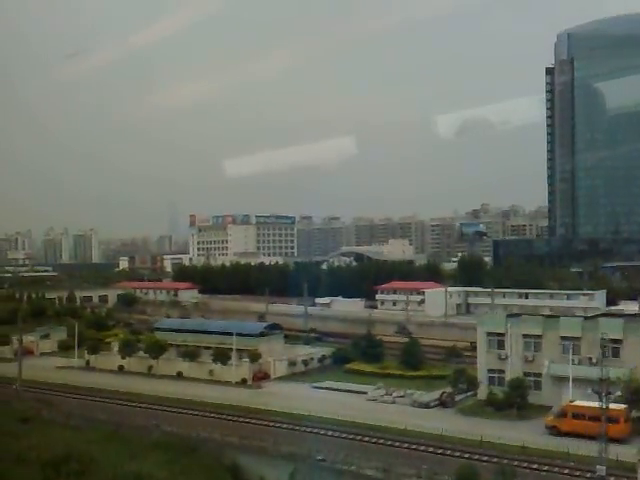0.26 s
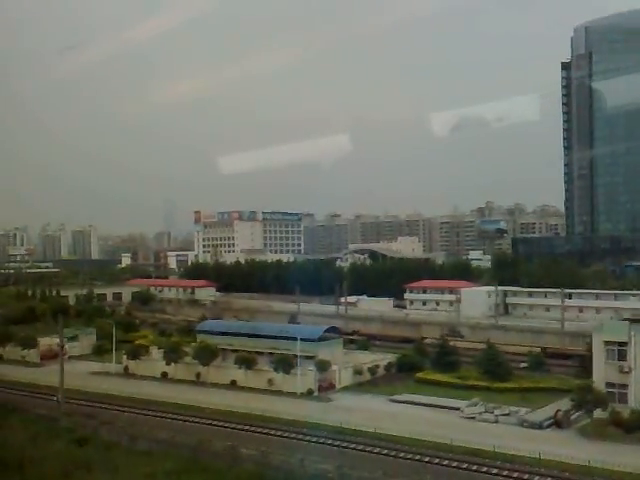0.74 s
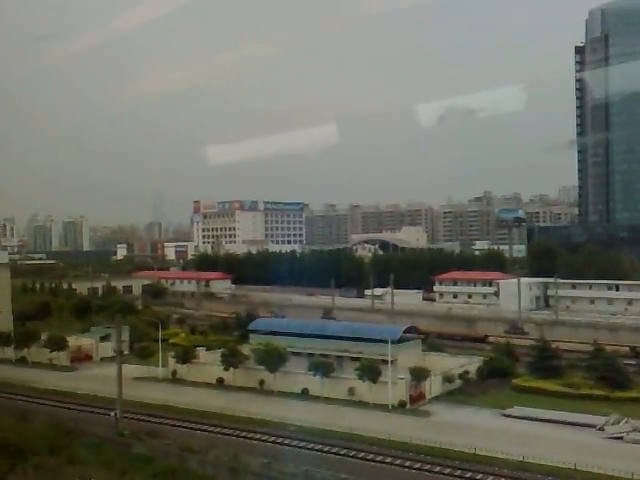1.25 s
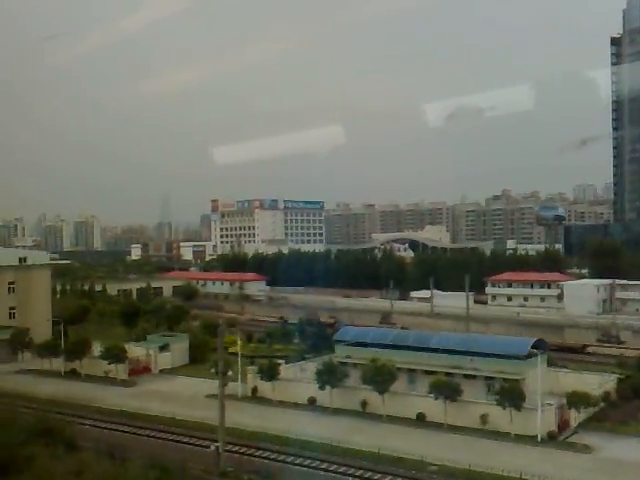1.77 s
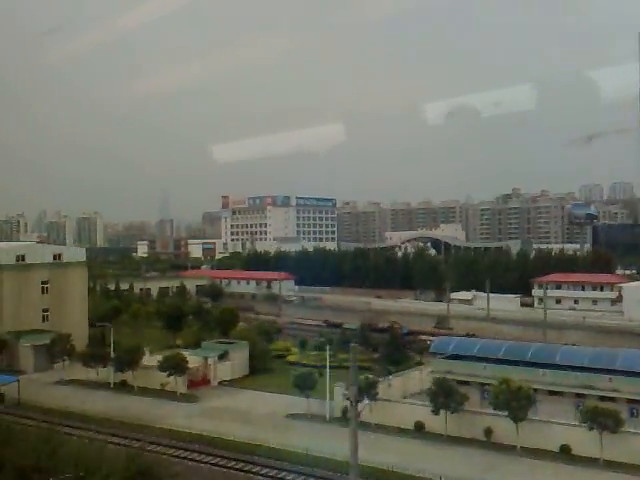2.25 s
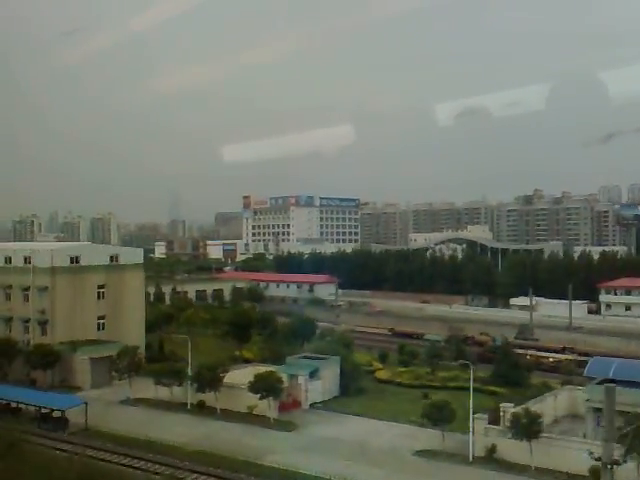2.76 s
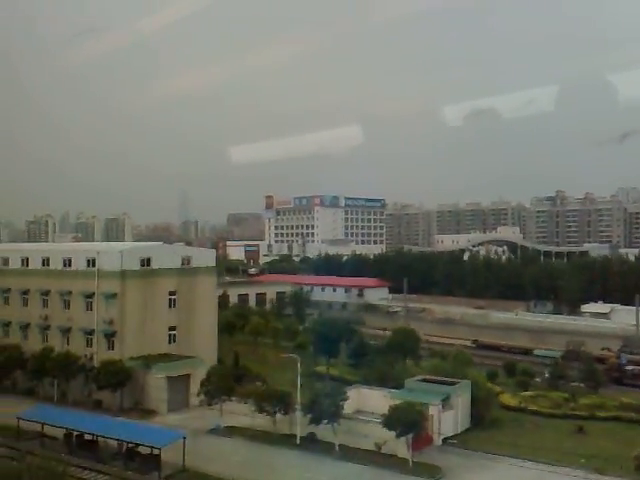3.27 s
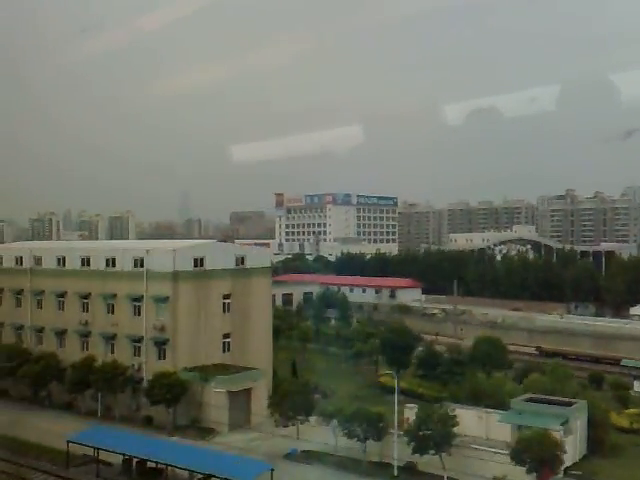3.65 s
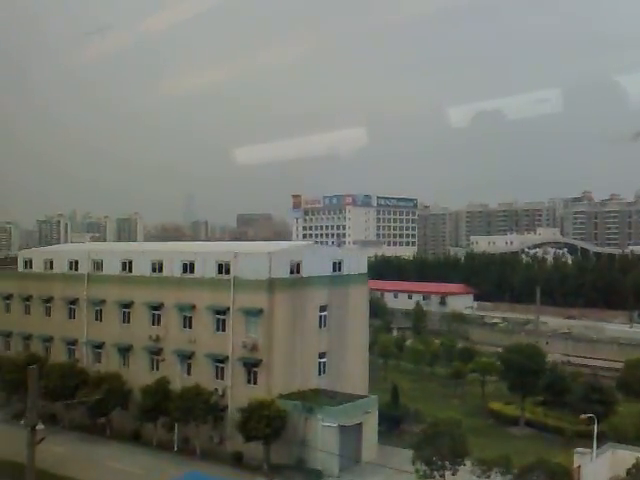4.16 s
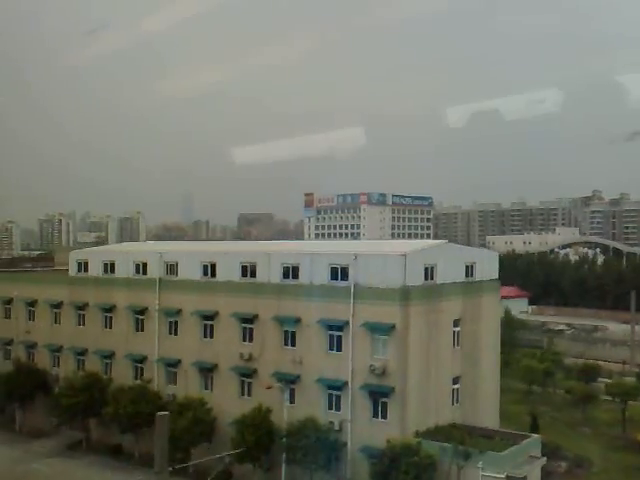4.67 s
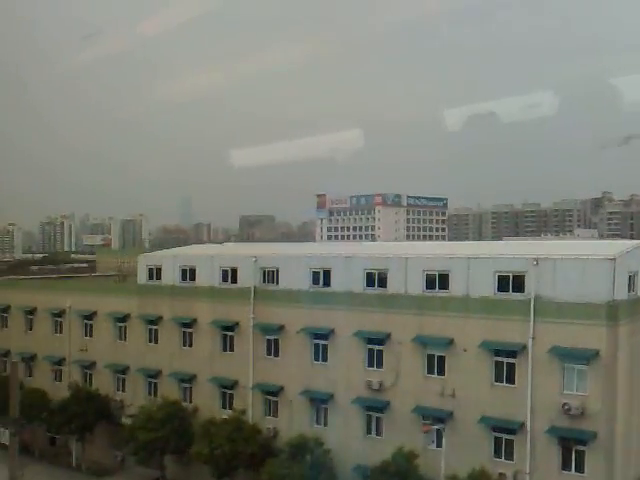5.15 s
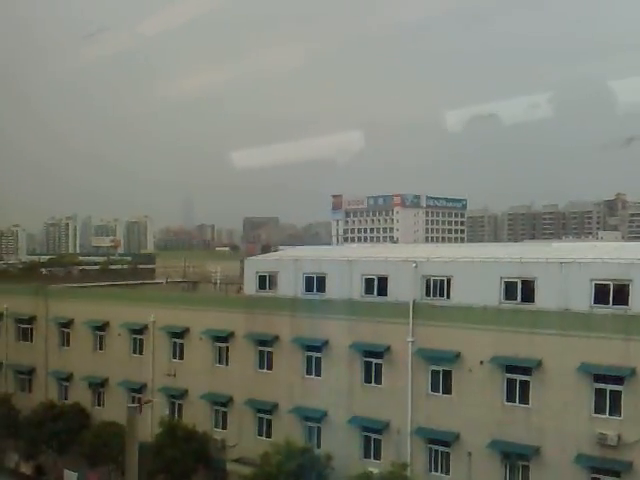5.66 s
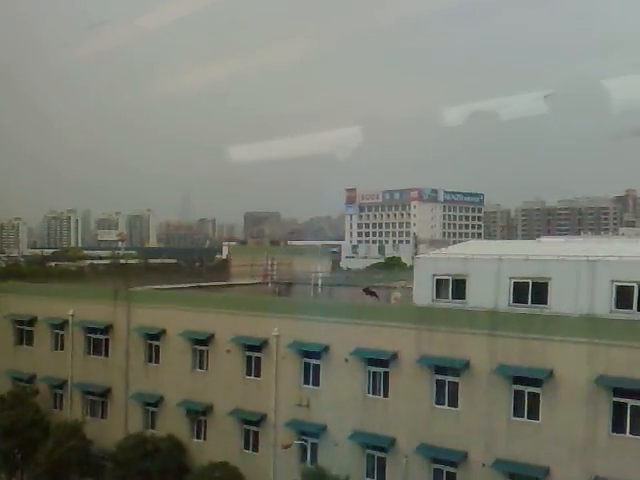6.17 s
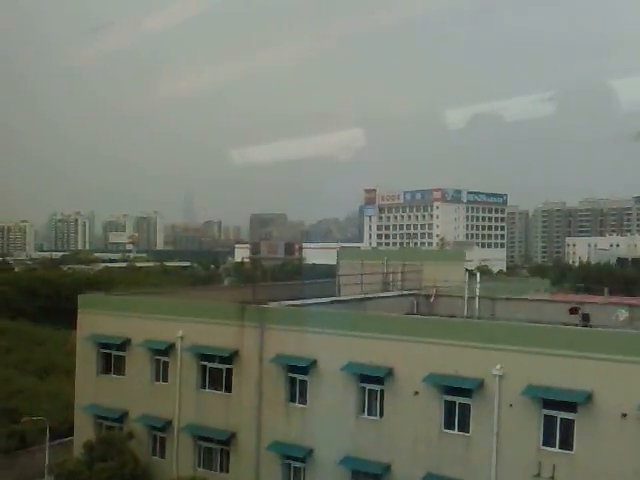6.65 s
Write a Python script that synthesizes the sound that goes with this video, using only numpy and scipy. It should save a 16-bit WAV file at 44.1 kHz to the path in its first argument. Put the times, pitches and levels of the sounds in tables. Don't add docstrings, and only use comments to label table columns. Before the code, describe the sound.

Interior of a magnetic train slowing down, captured by a small hand-held camera at seat height. At 0 s the last swing of a soft low thump fades into continuous deep rumble, mostly 50 to 150 hertz, rising and easing with the ride. Over it a clean low whine starts near 310 hertz and glides to about 265 by 6.9 s, swelling around 1.3, 3 and 5 s and dipping between, with fainter high and low tones falling alongside. Muted air rush and slight hiss stay steady; panels shudder briefly. At 1.13-1.18 s a nearby latch rattles with a short buzz. Tiny dry finger clicks on plastic come at 1.3, 1.45, 2.6 and 3.3 s, loudest at 3.5, then 5.0, 5.4, 6.5 and 6.65 s. Faint cloth rubs and strap squeaks are scattered among them. From about 5 s a throbbing cabin boom near 97 hertz grows stronger. Very short, padded echo.

```python
import sys
import numpy as np
from scipy import signal
from scipy.io import wavfile
from scipy.ndimage import uniform_filter1d, map_coordinates

SR = 44100
rng = np.random.default_rng(int(sys.argv[2]) if len(sys.argv) > 2 else 0)


def put_to_file(sound):
    columns = np.atleast_2d(sound).T
    safe = np.clip(columns, -1, 1)
    whole_steps = np.round(safe * 32767)
    wavfile.write(sys.argv[1], SR, whole_steps.astype(np.int16))


def volts_from_db(level):
    exponent = np.asarray(level, float) / 20
    return 10 ** exponent


N = 304731
STEP = 256


def evened(x):
    return x / np.sqrt(np.mean(x ** 2) + 1e-20)


def peaked(x):
    return x / abs(x).max()


def curve(rows, t):
    s, db = np.transpose(rows)
    return np.interp(t, s, db)


def slow_times():
    return np.arange(0, N + STEP, STEP) / SR


def fine(slow):
    return np.interp(np.arange(N) / STEP, np.arange(len(slow)), slow)


def wander(per_s):
    knots = rng.standard_normal(400)
    return map_coordinates(knots, [slow_times() * per_s], order=3)


def bell(t, s, span):
    return np.exp(-.5 * ((t - s) / span) ** 2)


def add(mix, s, sound):
    part = mix[round(s * SR):][:len(sound)]
    part += sound[:len(part)]


def resonate(x, hz, width_hz):
    r = np.exp(-np.pi * width_hz / SR)
    return (1 - r) * signal.lfilter([1, -r], [1, -2 * r * np.cos(2 * np.pi * hz / SR), r * r], x)


def resonate_twice(x, hz, width_hz, second_width_hz):
    return resonate(resonate(x, hz, width_hz), hz, second_width_hz)


def tone(turns, db):
    return np.sqrt(2) * fine(volts_from_db(db)) * np.sin(2 * np.pi * (turns + rng.random()))


def thump():
    t = np.arange(N) / SR
    return volts_from_db(-12.5) * np.exp(-.5 * (t / 0.0054) ** 2) * np.cos(2 * np.pi * 85 * (t - 0.0024))


# (time [s], level [dB])
WHINE = [(0, -44), (.2, -32), (1.2, -23.5), (1.5, -23.5), (1.72, -34.5), (1.95, -32), (2.12, -41.5),
         (2.4, -28.5), (3.2, -26), (3.55, -34.5), (3.82, -28), (4.16, -41.5), (4.4, -26.5), (4.85, -23),
         (5.45, -25.5), (5.8, -31.5), (6.7, -34.5), (6.91, -29.5)]
STRONG_ORDERS = (6, 6, 6, 12, 12, 12, 12, 141, 141, 141, 142, 142, 142, 144, 144, 144, 144, 144, 216, 144,
                 216, 216, 66, 66, 66, 143, 134, 136)
# (top level [dB], time [s], span [s])
STRONG_SWELLS = [(-32.5, 1.6, 0.68), (-34.5, 3.3, 1.3), (-35, 6.1, 0.99), (-30, 0.98, 0.55),
                 (-30, 3.1, 1.6), (-31.5, 5.2, 0.4), (-30, 4.7, 0.12), (-45.5, 2.9, 0.44), (-38, 5.7, 0.65),
                 (-49, 6.8, 0.23), (-41.5, 3.45, 0.26), (-38.5, 4.3, 0.4), (-53.5, 5.8, 0.76),
                 (-46.5, 0.3, 0.5), (-45, 2.8, 1.2), (-44.5, 3.4, 0.63), (-40.5, 4.15, 0.72),
                 (-43, 5.6, 0.92), (-63, 1.5, 1.8), (-41.5, 6.85, 0.24), (-59, 3.7, 0.9),
                 (-56.5, 6.3, 0.88), (-47.5, 0.88, 0.8), (-41, 2.5, 0.29), (-39.5, 5.7, 0.7),
                 (-43.5, 2.4, 1.1), (-53, 0.54, 0.4), (-49, 6.75, .2)]
FAINT_ORDERS = (14, 18, 24, 30, 32, 48, 54, 60, 66, 68, 78, 132, 134, 136, 138, 140, 146, 162, 210, 288)
# (top level [dB], time [s], span [s])
FAINT_SWELLS = [(-40.5, 2.1, 4.3), (-40.5, 5.6, 1), (-42.5, 1.2, 2), (-33, 0.6, .6), (-43, 3.3, 3.6),
                (-45, 3.9, 8), (-55.5, 1.1, 0.9), (-44.5, 5.4, 0.4), (-57.5, 1.3, 0.59), (-46, 3.6, 1.3),
                (-46, 2.9, 0.14), (-53, 1.5, 1), (-51.5, 3.3, 3.8), (-49.5, 3.6, 0.49), (-48, 4.4, 0.67),
                (-48.5, 6.5, 0.5), (-47.5, 4.6, 0.14), (-61.5, 2.5, 1.4), (-66, 1.3, 2.7), (-70.5, 5, 5.9)]
SLOTS_PER_GIRDER = 72
SLOT_HZ, BRAKE_HZ_PER_S, BRAKE_GROWTH_HZ_PER_S2 = 312.9, 5.2, .22


def magnets():
    t = slow_times()
    hz = SLOT_HZ - BRAKE_HZ_PER_S * t - BRAKE_GROWTH_HZ_PER_S2 * t ** 2 + 0.28 * wander(1.477)
    girders = np.cumsum(fine(hz)) / SR / SLOTS_PER_GIRDER
    waver_db = .8 + 1.8 * (t > 6.05)
    slot_turns = SLOTS_PER_GIRDER * girders + fine(0.025 * wander(12.))
    out = tone(slot_turns, curve(WHINE, t) + waver_db * wander(8.0))
    for order, (db, s, span) in zip(STRONG_ORDERS, STRONG_SWELLS):
        fade_db = -30 * (1 - bell(t, s, span))
        out += tone(order * girders, db + fade_db + 1.5 * np.tanh(wander(5.5)))
    for order, (db, s, span) in zip(FAINT_ORDERS, FAINT_SWELLS):
        fade_db = -20 * (1 - bell(t, s, span))
        out += tone(order * girders, db + fade_db + 3.2 * np.tanh(wander(4.)))
    return out


def boom():
    t = slow_times()
    awake = .5 + .5 * np.tanh((t - 5.2) / 0.79)
    throb = np.cos(2 * np.pi * (t - 1.16) / 0.98)
    throb_db = 4.5 + (1 - 4.5) * awake
    level_db = -35.5 + (-28 + 35.5) * awake + throb_db * throb - 1.06 * wander(6.)
    hz = 96.9 + (2.5 - 1.8 * awake) * wander(3.)
    return tone(np.cumsum(fine(hz)) / SR, level_db)


# (frequency [Hz], width [Hz], level [dB])
PANELS = [
    (576.7, 49.7, 12),
    (672, 10, -4),
    (679, 40, 5),
    (848, 56, 8),
    (1706, 28, 7),
    (2000, 150, 0),
]


def rush(spectrum, control, size, top_share, above_hz, patchy_db):
    frames, hz = 4 * N // size + 5, np.fft.rfftfreq(size, 1 / SR)
    a, b, patches = rng.standard_normal((frames, len(hz), 3)).T
    patches = evened(uniform_filter1d(uniform_filter1d(patches, size=9, axis=0), size=7, axis=1))
    f, db = np.transpose(spectrum)
    shape_db = np.interp(np.log(hz + 1), np.log(f + 1), db)
    for centre, width, gain_db in PANELS:
        shape_db += gain_db / (1 + (2 * (hz - centre) / width) ** 2)
    top = (hz ** 4 / (hz ** 4 + above_hz ** 4))[:, None]
    tilt_db = (top_share - 1) * curve(control, np.arange(frames) * size / 4 / SR)
    field_db = shape_db[:, None] + top * tilt_db + patchy_db * patches
    spectra = (a + 1j * b) * volts_from_db(field_db)
    return evened(signal.istft(spectra, nperseg=size, noverlap=3 * size // 4)[1][:N])


# (frequency [Hz], density [dB per Hz])
RUMBLE = [(12, -33.5), (30, -17.5), (50, -1.5), (68, -5), (90, 0.5), (120, -7), (140, -7), (165, -10),
          (220, -17), (300, -12), (350, -22), (500, -22.5), (740, -37), (2000, -94.5)]
# (time [s], level [dB])
RIDE = [(0, 1), (.4, 0.5), (1.2, -2.5), (1.85, 0), (2.1, 2), (2.55, 0.5), (2.9, -2), (3.9, -0.5),
        (4.2, 1.5), (4.35, -3), (4.62, 0), (5.3, -2), (5.5, -5), (5.9, -1.5), (6.4, -0.5), (6.75, -1.5),
        (6.86, -4), (6.91, 5.5)]


def rumble():
    noise = rush(RUMBLE, RIDE, size=4096, top_share=0.35, above_hz=140, patchy_db=1.04)
    return fine(volts_from_db(-24.5 + curve(RIDE, slow_times()))) * noise


# (frequency [Hz], density [dB per Hz])
AIR = [(300, -25), (650, -3.5), (850, -10.5), (1010, -9), (1580, -17), (1920, -17.5), (2770, -28),
       (5000, -35.5), (9480, -41), (15000, -42), (16500, -43.5)]
# (time [s], level [dB])
GUSTS = [(0, -1), (.6, -0.5), (1.1, -2.5), (1.7, 0.5), (2.2, 0.5), (2.9, -1), (3.3, -0.5), (3.9, 0),
         (4.3, 1.5), (4.8, -2.5), (5.3, -2), (5.5, -1), (5.9, -1), (6.2, 0), (6.91, 1.5)]


def air():
    noise = rush(AIR, GUSTS, size=1024, top_share=0.65, above_hz=1000, patchy_db=1.23)
    return fine(volts_from_db(-48.5 + curve(GUSTS, slow_times()) + 0.4 * wander(6.))) * noise


def hums(rows):
    out = np.zeros(N)
    for s, length, db, hz, width_hz in rows:
        hum = resonate_twice(rng.standard_normal(2 * SR), hz, width_hz, 2 * width_hz)
        hum = hum[SR // 2:][:round(length * SR)]
        add(out, s, volts_from_db(db) * evened(hum) * signal.windows.tukey(len(hum), .6))
    return out


# (start [s], length [s], level [dB], centre [Hz], width [Hz])
SHUDDERS = [(0, .35, -30, 51, 5), (0, 0.51, -34, 129.6, 6), (.45, .5, -32.5, 77.8, 5.4),
            (2.05, 0.44, -28, 103.4, 6.5), (2.098, .6, -32.5, 76, 6.7), (2.598, 0.31, -31.5, 60.7, 5.3),
            (3.5, 0.34, -33, 140, 16), (3.85, 0.7, -39, 240, 30), (3.952, 0.38, -29, 55, 6.4),
            (5.201, 0.59, -29, 87.2, 6.3), (5.699, .45, -29.5, 66.8, 9.9), (6., .7, -37, 264, 44),
            (6.1, 0.73, -33, 87.8, 4.9)]


def shudders():
    return hums(SHUDDERS)


# (start [s], length [s], level [dB], centre [Hz])
SQUEAKS = [(0, 0.052, -58.5, 2020), (.125, 0.22, -64, 1900), (.43, 0.053, -62.5, 2060),
           (4.2, 0.069, -52, 793), (2.57, 0.079, -63, 1480), (4.197, 0.12, -59, 1700),
           (5.015, 0.044, -68, 2690), (5.06, 0.022, -58.5, 2000), (5.262, 0.02, -72, 4110),
           (5.283, .022, -77, 4200), (5.303, .05, -70.5, 4100), (5.572, 0.015, -68, 3300),
           (5.584, 0.011, -64, 3800), (5.582, .015, -74, 7600), (6.27, 0.035, -59, 2000),
           (6.31, .022, -63, 2000), (6.215, .016, -64, 1900)]
# (start [s], length [s], level [dB], centre [Hz])
RUBS = [(.205, 0.03, -57, 1750), (.81, 0.027, -64.5, 2199), (1.901, 0.038, -69, 6470),
        (1.999, 0.079, -52, 952), (2.12, 0.092, -61.5, 2000), (2.738, .022, -70.5, 6270),
        (5.02, .06, -75, 3200), (5.262, 0.046, -72.5, 5000), (5.3, .04, -75.5, 5400),
        (5.495, 0.025, -78, 5200), (6.636, 0.03, -71, 3900)]
# (start [s], length [s], level [dB], centre [Hz])
SWISHES = [
    (1.296, 0.039, -53.5, 1254),
    (1.655, .035, -69, 7054),
    (2.322, 0.036, -75, 7990),
    (3.484, 0.014, -57, 1500),
    (4.145, 0.055, -72, 9010),
    (5.569, 0.025, -72, 8000),
    (6.468, .055, -75, 5000),
    (6.72, 0.083, -80, 7950),
    (6.851, .013, -67, 8000),
    (6.873, .052, -70, 7000),
]


def rustles():
    out = np.zeros(N)
    for rows, share, steady in ((SQUEAKS, 0.065, .8), (RUBS, 0.26, 0), (SWISHES, 0.87, 0)):
        for s, length, db, hz in rows:
            grain = rng.standard_normal(8000) * volts_from_db(3.8 * rng.standard_normal(8000))
            puff = evened(resonate_twice(grain, hz, share * hz, 2 * share * hz))
            power = uniform_filter1d(puff ** 2, size=160) + .01
            puff = evened(puff / power ** (steady / 2))[:round(length * SR)]
            add(out, s, volts_from_db(db) * puff * signal.windows.tukey(len(puff), .4))
    return out


# (time [s], sharp level [dB], heavy level [dB])
LATCH_BLOWS = [(1.131, -8.5, -30.5), (1.1398, -11, -19), (1.1418, -4, 0.5), (1.1451, 3.5, -8.5),
               (1.1486, 0, -14), (1.1514, 0, -8), (1.1545, 1, -12), (1.1606, 1, 3.5), (1.164, -11, -11.5),
               (1.173, -7, -23), (1.179, -10, -22)]
# (frequency [Hz], peak level [dB], 60 dB decay [s])
LATCH_MODES = [(523, -23.5, 0.05), (817, -33.5, 0.022), (885, -34.5, 0.018), (1290, -47, 0.024),
               (1454, -35.5, 0.029), (1720, -40.5, 0.018), (2050, -38, 0.013), (2450, -48.5, 0.0174),
               (3000, -46.5, 0.016), (3300, -47.5, 0.018), (3700, -46.5, 0.013), (3840, -39, 0.011),
               (4930, -53, 0.016), (5240, -56.5, 0.014)]


def latch():
    scrape, push, t = np.zeros(N), np.zeros(N), np.arange(800) / SR
    for s, sharp_db, heavy_db in LATCH_BLOWS:
        grit = rng.standard_normal(len(t)) * (1 - np.exp(-t / 0.00018)) * np.exp(-t / 0.0022)
        add(scrape, s, volts_from_db(sharp_db) * grit)
        shove = (1 + 0.27 * rng.standard_normal(len(t))) * np.exp(-t / 0.00017)
        add(push, s, volts_from_db(heavy_db) * shove)
    late = np.maximum(np.arange(N) / SR - LATCH_BLOWS[3][0], 0)
    out = np.zeros(N)
    for hz, db, t60 in LATCH_MODES:
        drive = push if hz < 1100 else scrape * volts_from_db(-.06 * hz * late)
        out += volts_from_db(db) * peaked(resonate_twice(drive, hz, 2.4 / t60, 5 / t60))
    tiring = scrape * volts_from_db(-450. * late)
    crack = resonate_twice(scrape, 2200, 2500, 5000)
    hiss = resonate_twice(tiring, 7730, 500, 500)
    return out + volts_from_db(-58) * peaked(hiss) + volts_from_db(-44.0) * peaked(crack) + volts_from_db(-48) * peaked(tiring)


# (start [s], length [s], level [dB], centre [Hz], width [Hz])
BUZZES = [(3.8, 0.0088, -58, 2100, 400), (6.4762, .003, -46, 1800, 500), (1.3015, .005, -54, 2400, 250),
          (1.311, .008, -50, 2350, 200), (1.142, .012, -48.5, 2040, 122), (1.143, .024, -38, 522, 15),
          (1.15, .009, -59, 5350, 200), (1.168, .007, -53, 3800, 500), (6.456, 0.0067, -52, 1800, 500),
          (3.479, 0.006, -54, 1600, 400), (5.268, .02, -70, 5600, 800), (6.643, .01, -67, 4000, 600)]


def buzzes():
    return hums(BUZZES)


# (time [s], peak level [dB], ring [Hz], half length [s], sharp edge relative level [dB])
CLICKS = [(1.302, -45, 1720, .0012, -27), (1.315, -44, 1700, 0.0014, -24),
          (1.452, -47.5, 1750, 0.0019, -26), (2.579, -47, 1490, 0.0044, -36),
          (3.272, -46, 1720, 0.0021, -30), (3.4826, -33, 1740, 0.0024, -25),
          (3.528, -38.5, 1730, 0.002, -26), (5.007, -51, 3840, .0004, -16.5),
          (5.416, -48, 1600, .0012, -26.5), (6.4747, -37.5, 1780, 0.0015, -35),
          (6.639, -37.5, 1650, 0.002, -40), (6.643, -47, 1700, 0.0027, -36)]
SHELL = [
    (.7, 0.27),
    (1., 0.52),
    (1.21, 0.33),
    (1.42, 0.43),
    (1.7, 0.1),
    (2.3, 0.06),
    (3.7, 0.056),
]


def clicks():
    out, t = np.zeros(N), np.arange(-300, 700) / SR
    for s, db, hz, spread, edge_db in CLICKS:
        u = np.where(t < 0, t / .75, t) / spread
        top = volts_from_db(edge_db + 25)
        ring = np.zeros(len(t))
        for ratio, share in SHELL:
            level = share * (top if ratio > 2 else 1)
            swell = np.exp(-.5 * u ** 2 * ratio ** 1.5)
            ring += level * swell * np.cos(2 * np.pi * ratio * hz * t + .35 * rng.standard_normal())
        edge = evened(resonate_twice(rng.standard_normal(len(t)), 6000, 3500, 5000))
        edge = edge * np.exp(-abs(t + .001) / 0.003)
        add(out, s + t[0], volts_from_db(db) * (ring + volts_from_db(edge_db) * edge))
    return out


def cabin_echo(x, t60, delay_s):
    t = np.arange(SR // 4) / SR
    tail = rng.standard_normal(len(t)) * volts_from_db(-60 * t / t60) * (t > delay_s)
    tail = resonate(tail, 3000, 7000)
    return signal.fftconvolve(x, tail / np.linalg.norm(tail))[:N]


def scene():
    train = thump() + magnets() + boom() + rumble() + air() + shudders()
    near = rustles() + latch() + clicks()
    echo = volts_from_db(-14.5) * cabin_echo(near, t60=0.09, delay_s=0.004)
    return (train + near + echo + buzzes())[None]


def roll_off(x):
    return signal.sosfilt(signal.butter(12, 16850, fs=SR, output="sos"), x)


def record(dry):
    taps = signal.firwin(1023, 15720, window=("kaiser", 9), fs=SR)
    limited = signal.oaconvolve(np.pad(dry[0], 511, "reflect"), taps, "valid")
    return roll_off(limited[None])


dry = scene()
out = record(dry)
put_to_file(out)
```